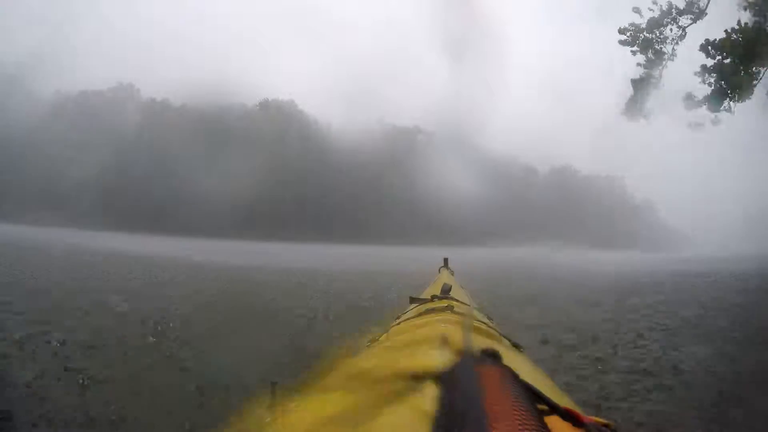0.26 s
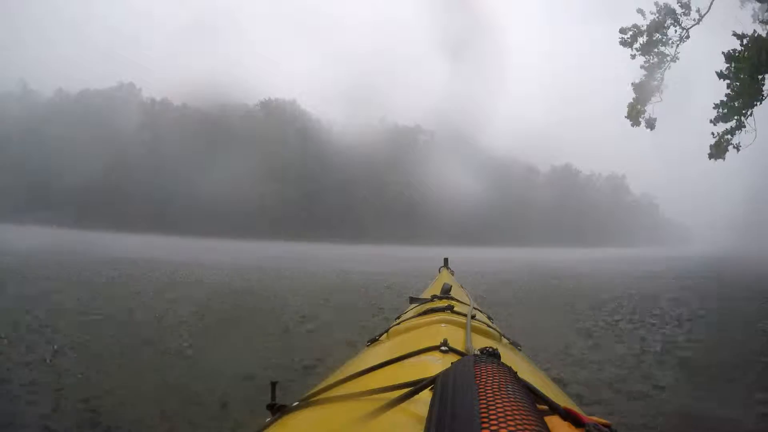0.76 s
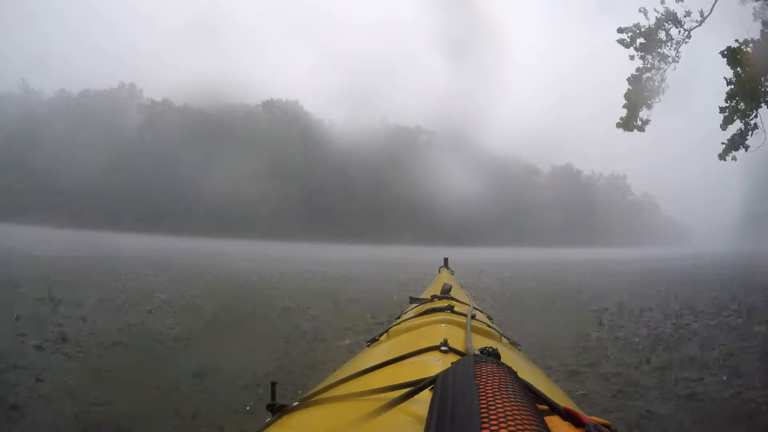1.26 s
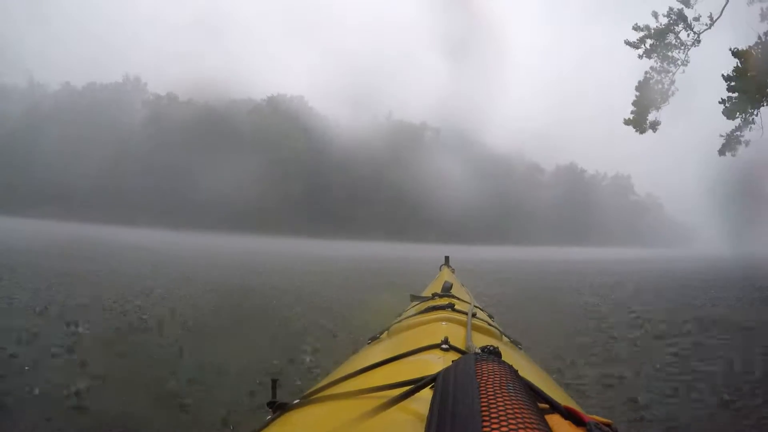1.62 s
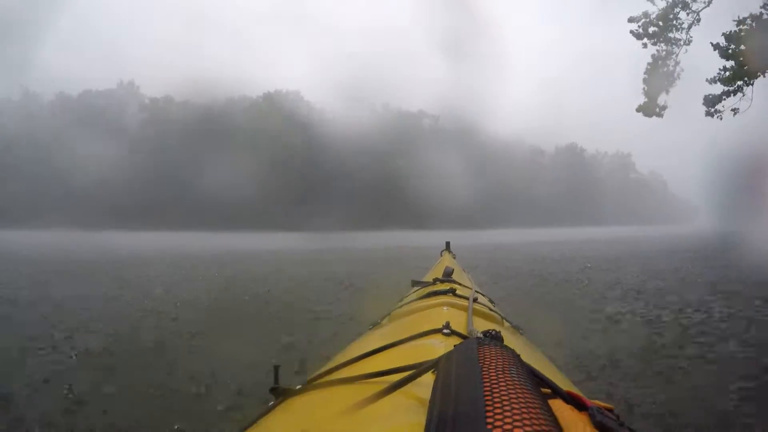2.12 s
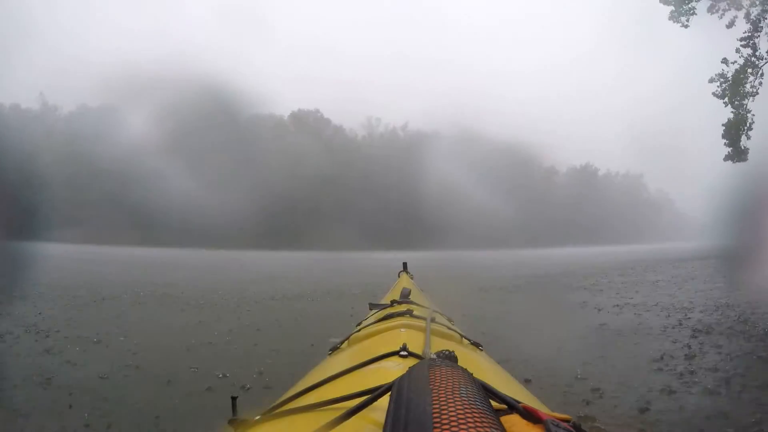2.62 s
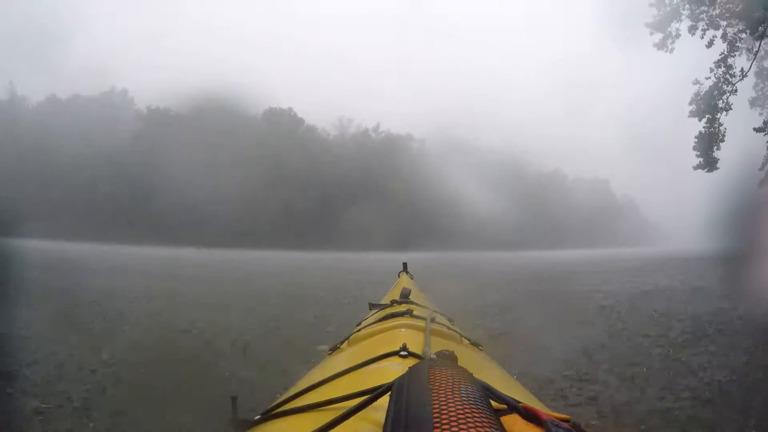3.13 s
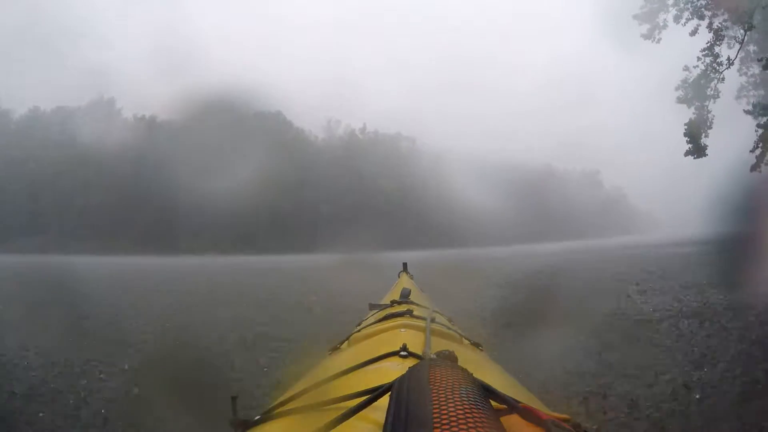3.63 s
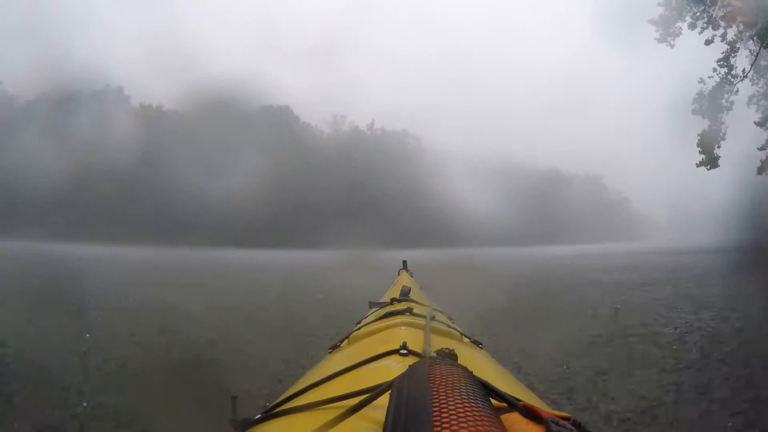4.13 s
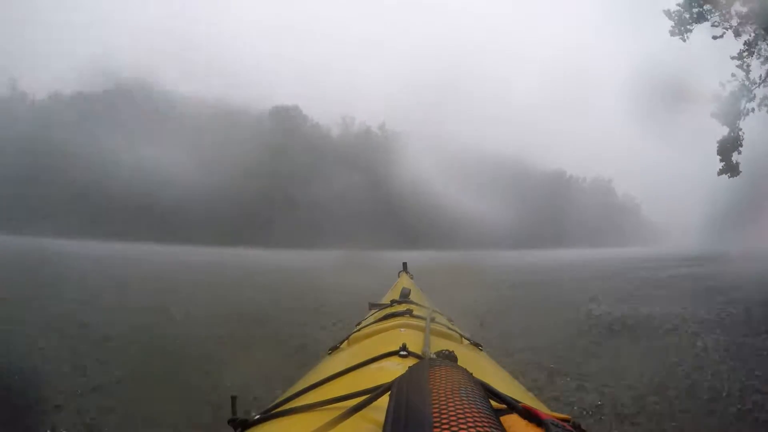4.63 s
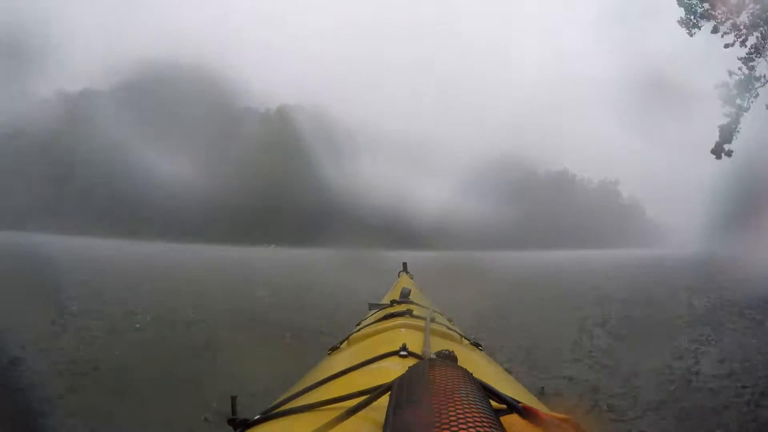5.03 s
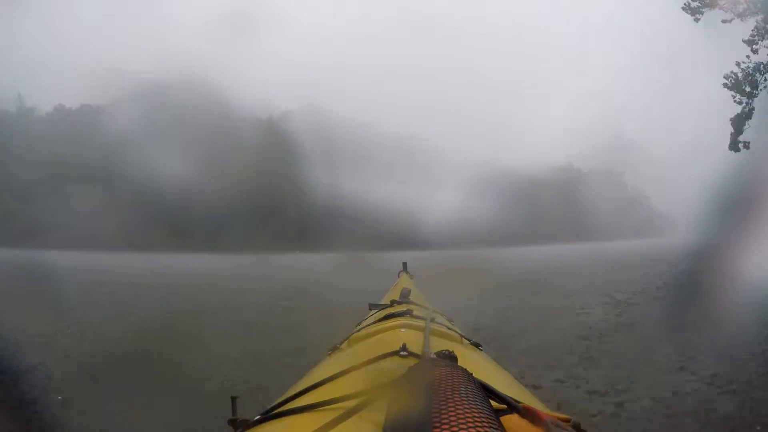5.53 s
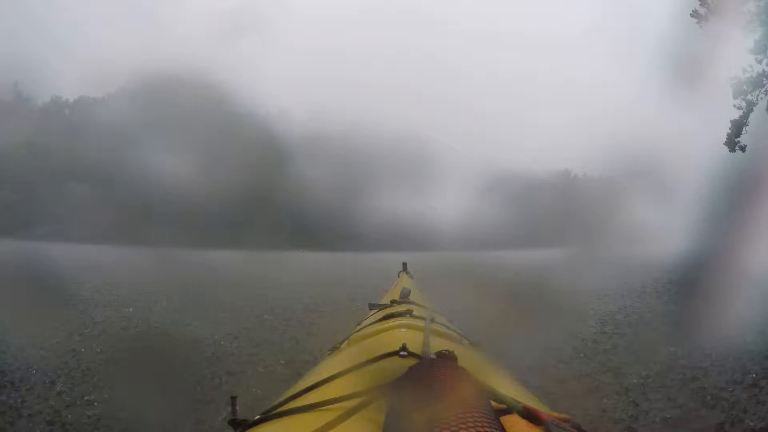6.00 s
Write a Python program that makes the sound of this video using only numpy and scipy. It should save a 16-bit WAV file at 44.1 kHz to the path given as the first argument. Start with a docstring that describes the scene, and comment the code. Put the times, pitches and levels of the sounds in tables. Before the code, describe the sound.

Heavy rain on a river, heard extremely close from a small camera housing on a kayak. For about two seconds it is dull and underwater-like, with hollow knocks, bubble blips, soft hiss and low thumps. A very brief silence follows, then the sound snaps open: dense bright drops crack and tick over river hiss, with lumpy wind rumble and occasional thumps.

```python
"""Muffled knocks of heavy rain come first, as if heard under a film of water, with bubbles and a quiet river.
After a very short silence the sound is open and bright: drops crack on a small camera housing on a kayak.
Drops are noise bursts ringing resonances; bubbles and thumps on the mount are damped gliding tones.
The river is fluttering noise coloured by the microphone port; the wind is lumpy, mostly low noise.
The loudest sounds overload the input, which clips them."""
import sys
import numpy as np
from scipy.fft import rfft, irfft, next_fast_len
from scipy.io import wavfile
from scipy.ndimage import map_coordinates

SR = 44100
rng = np.random.default_rng(int(sys.argv[2]) if len(sys.argv) > 2 else 0)


def materialize(psi):
    """Save the field psi as 16-bit PCM at rate SR to the path in sys.argv[1].

    A 1-D psi becomes a single channel; in a 2-D psi each row is a channel.
    """
    bounded = np.clip(np.atleast_2d(psi).T, -1, 1)
    quanta = np.round(bounded * 32767).astype(np.int16)
    wavfile.write(sys.argv[1], SR, quanta)


N = 276062

# Silence between the muffled and the open part: (start [s], end [s])
GAP = (2.1943, 2.2072)
SPLIT_HZ = 4300  # modes above it form a drop's snap, the others its knock
TOP_HZ = 16600  # band limit of the input

# Wind rumble spectra of the two parts: (frequency [Hz], relative density [dB])
MUFFLED_RUMBLE = [(15, -39), (30, 6.5), (80, -4), (140, -7), (280, -17.5), (600, -23.5), (1500, -57)]
OPEN_RUMBLE = [(20, -31), (60, -6), (170, -4), (260, 1.5), (400, -6.5), (550, -5), (750, -12.5),
               (1500, -23.5), (4000, -28.5)]
# Background of the muffled part: (time [s], river hiss level [dB], wind rumble level [dB])
MUFFLED_BACKGROUND = [(0, -42, -31), (.35, -39.5, -37.5), (.7, -38.5, -36), (1.05, -40, -32.5),
                      (1.3, -37.5, -26.5), (1.5, -33.5, -25.5), (1.75, -37.5, -29), (1.95, -43.5, -25.5),
                      (2.19, -48, -38)]
# Gusts in the open part, rumbling at the port and driving the rain on the water: (time [s], rumble level [dB])
GUSTS = [(2.21, -18), (2.33, -30), (2.6, -41.5), (2.73, -26.5), (2.83, -36.5), (3.05, -37.5), (3.16, -29.5),
         (3.33, -39), (3.65, -33.5), (3.79, -41.5), (3.92, -29.5), (4.26, -35.5), (4.57, -32.5),
         (4.72, -29.5), (5.03, -33.5), (5.12, -25), (5.24, -35), (5.39, -23), (5.53, -33.5), (5.78, -36),
         (5.95, -28), (6.26, -38)]
# Clear bubbles in the water film: (time [s], level before the envelope [dB], starting pitch [Hz])
BUBBLES = [(.061, -24, 780), (.342, -33, 900), (.398, -31, 736), (.418, -36, 730), (.72, -42, 700),
           (1.413, -12, 2160), (1.469, -24.5, 2300), (1.638, -19, 1050), (1.888, -9, 2000),
           (2.001, -31, 2050), (2.038, -20.5, 870)]
# Thumps on the mount: (time [s], strength signed by the first swing [1], starting pitch [Hz],
# final pitch [Hz], time to decay by 60 dB [s])
THUMPS = [(1.341, 0.9, 44, 18, 0.21), (1.417, 0.65, 30, 14, 0.2), (1.553, -0.44, 40, 25, 0.16),
          (1.817, 0.45, 59.6, 46, 0.15), (1.9232, 1.6, 200, 78, 0.01), (1.9953, 1.5, 700, 46, 0.096),
          (2.037, -2, 61, 27, 0.074), (2.1755, 2.1, 330, 36, .045), (2.526, 0.33, 750, 116, 0.022),
          (2.7065, -1.5, 191, 120, 0.027), (2.891, 0.36, 700, 67, 0.027), (3.4546, 0.32, 766, 110, 0.016),
          (4.0884, 1.14, 195, 160, 0.037), (4.126, 5.5, 127, 91, 0.041), (4.152, 0.8, 90, 48, 0.08),
          (4.175, 1, 188, 164, 0.056), (4.192, .5, 606, 155, 0.046), (4.3032, 2.5, 160, 113, 0.051),
          (4.3284, 1.23, 764, 98, 0.0073), (4.448, 3, 174, 132, 0.047), (4.4792, 3, 950, 57, 0.023),
          (5.666, 3.5, 228, 94, 0.016)]
# Resonances of housing and port in the two parts: (frequency [Hz], width [Hz], relative level [dB])
MUFFLED_MODES = [(700, 61, -13), (1270, 390, -5), (2265, 390, -2.5), (2776, 350, -5), (3945, 610, -15),
                 (5250, 400, -19), (6950, 740, -19.5), (6550, 3300, -26), (11900, 6000, -36.5)]
OPEN_MODES = [(1028, 304, -5), (2907, 480, 1.5), (5250, 655, -4), (6946, 630, -3.5), (9080, 1630, 2.5),
              (10710, 1990, 1), (14960, 880, -13.5)]
# Loudest drops on the housing: (time [s], snap level above the split [dB], knock level below it [dB])
DROPS = [(0.0051, -33, -20), (0.0228, -29, -22), (0.0436, -25, -5.5), (0.13, -32, -14),
         (0.2485, -37, -20.5), (0.3598, -56, -23), (0.414, -43, -22), (0.4448, -48, -25),
         (0.5032, -40, -16), (0.7163, -40, -23), (0.7763, -55, -19), (1.0859, -33, -7.5),
         (1.3542, -40, -16), (1.3785, -34, -24), (1.398, -52, -23), (1.4147, -52, -32), (1.4893, -46, -15),
         (1.4988, -35, -19.5), (1.502, -49, -26), (1.5888, -40, -25.5), (1.7178, -28, -16.5),
         (1.749, -49, -18.5), (1.766, -52, -16.5), (1.8049, -35, 2.5), (1.885, -50, -6),
         (1.9221, -16, -6.5), (1.9341, -26, -16.5), (1.996, -28, -1), (2.0828, -24, -25.5),
         (2.1749, -12, -9), (2.2141, -3, -11), (2.2224, -7, -25), (2.2473, 2, -25), (2.264, -11.5, -34),
         (2.3002, -7, -32), (2.311, -7.5, -15), (2.3627, -26, -18), (2.4127, 5, -19), (2.4341, -10.5, -41),
         (2.478, -12, -20.5), (2.4909, -9, -21), (2.5262, -5, -26), (2.6099, -7.5, -24), (2.694, -7.5, -37),
         (2.7032, -8.5, -10.5), (2.745, -2.5, -13.5), (2.7681, 3, -29), (2.79, -7, -35), (2.824, -6.5, -38),
         (2.871, -8, -35), (2.8909, -2, -22), (2.936, -8, -33), (3.002, -15, -30), (3.0081, -10.5, -24),
         (3.098, -14.5, -26), (3.1072, -15.5, -30), (3.135, -10.5, -41), (3.173, -7.5, -23),
         (3.1984, -4, -18), (3.2027, -11, -27), (3.238, -18, -45), (3.258, -8, -42), (3.301, -12.5, -30),
         (3.348, -3, -30), (3.397, -12, -39), (3.4099, -5, -31), (3.4204, 2.5, -28), (3.4549, -4.5, -28),
         (3.5048, -4, -22), (3.5415, -9, -30), (3.5627, 0, -29), (3.597, -5, -40), (3.643, -4.5, -40),
         (3.6731, -3, -28), (3.7128, -4, -19.5), (3.752, -8, -42), (3.7781, -14, -42), (3.8481, -15, -51),
         (3.904, -39, -16.5), (3.9319, -9, -33), (3.947, -10, -31), (3.9634, -8, -35), (3.976, 1, -29),
         (4.0046, -9, -19), (4.143, -3.5, -25), (4.1497, -11, -19.5), (4.165, -2, -19.5), (4.2036, -8, -29),
         (4.2153, -9.5, -36), (4.287, -2, -18), (4.3008, -7, -34), (4.313, -3.5, -38), (4.414, -8, -35),
         (4.4332, 0, -37), (4.4561, -6.5, -22), (4.5751, -4, -17), (4.585, -10, -30), (4.635, -13, -33),
         (4.6647, -9, -33), (4.6833, 8, -38), (4.689, -11, -21), (4.726, -5, -22), (4.7448, -3.5, -38),
         (4.763, -9, -34), (4.7787, -4, -24.5), (4.847, -15, -18), (4.864, -5.5, -38), (4.8955, -10.5, -36),
         (4.954, -5.5, -44), (5.007, -10, -45), (5.0115, -11.5, -40), (5.0864, -38, -16.5),
         (5.118, -4.5, -14), (5.1596, 0, -37), (5.1781, -8.5, -23), (5.2027, -39, -19.5),
         (5.2075, -11.5, -33), (5.2395, -13.5, -29.5), (5.263, -15, -36), (5.3642, -17, -32),
         (5.4079, -8, -14), (5.4169, -1, -28), (5.4427, -20, -41), (5.4662, -1, -46), (5.4865, -11, -45),
         (5.5097, -11, -27), (5.5839, -10, -33), (5.6293, -10, -21), (5.6411, -18, -19), (5.6665, 2.5, -38),
         (5.7172, -7, -34), (5.7542, -13.5, -42), (5.8134, -6, -31), (5.8418, -4.5, -31),
         (5.8696, -11, -21.5), (5.9005, -4, -18.5), (5.9169, 6, -16), (5.959, -10, -40), (6.009, -3, -24),
         (6.0198, -1, -16), (6.0306, -15, -16), (6.042, -5, -34), (6.0532, 0.5, -32), (6.065, -3, -30),
         (6.091, -8.5, -20.5), (6.1396, -6, -23.5), (6.1585, -13, -40), (6.1723, -7.5, -31),
         (6.1842, -3, -39), (6.2116, -4.5, -59), (6.2198, -1, -27)]


def amp(db):
    """Decibel law: 20 dB is a factor of ten in amplitude."""
    return 10 ** (np.asarray(db) / 20)


def unit(x):
    """Normalization: scale a signal to an RMS value of one."""
    return x / np.sqrt(np.mean(x ** 2) + 1e-20)


def curve(rows):
    """Linear interpolation: one value per sample for each column after the time."""
    times_s, *columns = np.transpose(rows)
    return [np.interp(np.arange(N) / SR, times_s, column) for column in columns]


def wobble(rate_hz):
    """Spline interpolation: a smooth random curve through rate_hz knots a second."""
    knots = rng.standard_normal(int(N * rate_hz / SR) + 4)
    return map_coordinates(knots, [np.arange(N) * rate_hz / SR])


def placed(times_s, rows):
    """Superposition: sum short sounds, one row each, starting at the given times."""
    where = np.round(times_s * SR).astype(int)[:, None] + np.arange(rows.shape[1])
    return np.bincount(where.ravel(), rows.ravel(), N + SR)[:N]


def filtered(x, response):
    """Linear filtering: multiply the spectrum, along the last axis, by a complex response of frequency."""
    n = x.shape[-1]
    padded = next_fast_len(n + 2048)
    spectrum = rfft(x, padded) * response(np.fft.rfftfreq(padded, 1 / SR))
    return irfft(spectrum, padded)[..., :n]


def resonant(modes, gains=None):
    """Modal superposition: sum causal resonances; gains, one row per blow, vary their strengths."""
    if gains is None:
        gains = np.ones((1, len(modes)))

    def response(f):
        total = 0
        for k, (centre, width, db) in enumerate(modes):
            mode = 1j * f * width / (centre * centre - f * f + 1j * f * width)
            total = total + (-1) ** k * gains[:, [k]] * amp(db) * mode  # neighbours have opposite signs
        return total

    return response


def wind(spectrum, level_db, lumps_db):
    """Turbulent rumble at the port: spectrally shaped noise whose level varies in random lumps."""
    hz, density_db = np.transpose(spectrum)
    noise = filtered(rng.standard_normal(N), lambda f: amp(np.interp(np.log(f + 1), np.log(hz), density_db)))
    return amp(level_db) * unit(noise * amp(lumps_db * wobble(30)))


def river(modes, level_db, flutter_db, octave_db):
    """Incoherent sum of countless far drops: noise tilted by about octave_db per octave, coloured by the port."""
    grains = rng.standard_normal(N) * amp(3 * wobble(900))
    port = resonant(modes)
    hiss = filtered(grains, lambda f: port(f)[0] * amp(octave_db * np.log2(f + 50)))
    return amp(level_db + flutter_db * wobble(16)) * unit(hiss)


def bubbles(rows):
    """Damped bubble oscillation: soft-starting tones that rise a little as the bubble closes."""
    times_s, db, hz = np.transpose(rows)[:, :, None]
    turns = hz * np.arange(1024) / SR
    envelope = np.exp(-turns / 5) * (1 - np.exp(-turns / .8))
    tone = np.sin(2 * np.pi * turns * (1 + 0.0056 * turns))
    return placed(times_s[:, 0], amp(db) * envelope * tone)


def thumps():
    """Damped oscillation of the mount: swings build over part of a cycle as their pitch falls."""
    out = np.zeros(N + SR)
    t = np.arange(SR // 4) / SR
    for start_s, strength, start_hz, end_hz, t60_s in THUMPS:
        fall_s = 1.005 / start_hz  # time constant of the pitch fall
        cycles = end_hz * t + (start_hz - end_hz) * fall_s * (1 - np.exp(-t / fall_s))
        rise = 1 - np.exp(-cycles / .3)
        decay = amp(-60 * t / t60_s)
        out[round(start_s * SR):][:len(t)] += strength * decay * rise * np.sin(2 * np.pi * cycles)
    return out[:N]


def patter(count, span, level_db, snap_db, knock_db, spread_db, scatter_db, top_db):
    """Exponential size statistics: drops at random times, many faint and ever fewer large, set from the hiss."""
    chance = rng.random((count, 2))
    tone_db = scatter_db * rng.standard_normal(count)  # trades snap against knock
    times_s = span[0] + (span[1] - span[0]) * chance[:, 0]
    base_db = level_db[(times_s * SR).astype(int)]
    size_db = np.minimum(-spread_db * np.log(1 - chance[:, 1]), top_db)
    snap = base_db + snap_db + size_db + tone_db
    knock = base_db + knock_db + .8 * size_db - tone_db
    return np.c_[times_s, snap, knock]


def strikes(rows, modes, splash_s, spot_db):
    """Impact excitation: decaying noise bursts ring the housing; the landing spot varies the mode strengths."""
    times_s, snap_db, knock_db = np.transpose(rows)
    t = np.arange(512) / SR
    envelope = np.exp(-t / splash_s) * (1 - np.exp(-t / .0001))
    burst = rng.standard_normal((len(times_s), len(t))) * envelope
    sound = 0
    for db, upper in ((snap_db, True), (knock_db, False)):
        part = [mode for mode in modes if (mode[0] > SPLIT_HZ) == upper]
        spot_gains = amp(spot_db * rng.standard_normal((len(times_s), len(part))))
        ring = filtered(burst, resonant(part, spot_gains))
        onset = np.sqrt(np.mean(ring[:, :110] ** 2, axis=1))  # levels are the RMS of the first 2.5 ms
        sound = sound + ring * (amp(db) / onset)[:, None]
    return placed(times_s, sound)


def muffled_part():
    """Modal damping of high frequencies: dull, longer-splashing drops and bubbles over a quiet river."""
    hiss_db, wind_db = curve(MUFFLED_BACKGROUND)
    background = wind(MUFFLED_RUMBLE, wind_db, lumps_db=3)
    background += river(MUFFLED_MODES, hiss_db, flutter_db=-1.5, octave_db=1.5)

    chance = rng.random((110, 3))
    faint = np.c_[GAP[0] * chance[:, 0], -40 + 13 * chance[:, 1], 600 * 4.5 ** chance[:, 2]]
    water = bubbles(BUBBLES) + amp(hiss_db + 37.0) * bubbles(faint)  # faint ones follow the hiss

    big = [drop for drop in DROPS if drop[0] < GAP[0]]
    small = patter(count=260, span=(0, GAP[0]), level_db=hiss_db, snap_db=-40, knock_db=-7.0,
                   spread_db=4, scatter_db=-5.5, top_db=15)
    rain = strikes(big, MUFFLED_MODES, splash_s=0.0013, spot_db=4.0)
    rain += strikes(small, MUFFLED_MODES, splash_s=0.00055, spot_db=19)
    return background + water + rain


def open_part():
    """Wideband modal response: sharp bright drops over a river hiss that swells with the gusts."""
    gust_db, = curve(GUSTS)
    hiss_db = -45.5 + 0.49 * (np.minimum(gust_db, -28) + 36)  # the swell stops growing at -28 dB
    background = wind(OPEN_RUMBLE, gust_db, lumps_db=3.0)
    background += river(OPEN_MODES, hiss_db, flutter_db=2.5, octave_db=-3.2)

    big = [drop for drop in DROPS if drop[0] > GAP[0]]
    small = patter(count=1300, span=(GAP[1], N / SR), level_db=hiss_db, snap_db=3.5, knock_db=-6,
                   spread_db=9, scatter_db=3.0, top_db=24.5)
    rain = strikes(big, OPEN_MODES, splash_s=0.00022, spot_db=3.5)
    rain += strikes(small, OPEN_MODES, splash_s=0.00034, spot_db=1.5)
    return background + rain


def scene():
    """Superposition in time: the muffled part, the silent gap and the open part, with thumps added to both."""
    t = np.arange(N) / SR
    both = np.where(t < GAP[0], muffled_part(), open_part()) + thumps()
    audible = (t < GAP[0]) | (t > GAP[1])
    return (both * audible)[None]


def record(dry):
    """Saturation and band limiting: the input clips near full scale, then the top of the band is removed."""
    clipped = dry / (1 + np.abs(dry / .99) ** 16) ** (1 / 16)
    return filtered(clipped, lambda f: np.clip((TOP_HZ - f) / 500, 0, 1) ** 2)


dry = scene()
out = record(dry)
materialize(out)
```